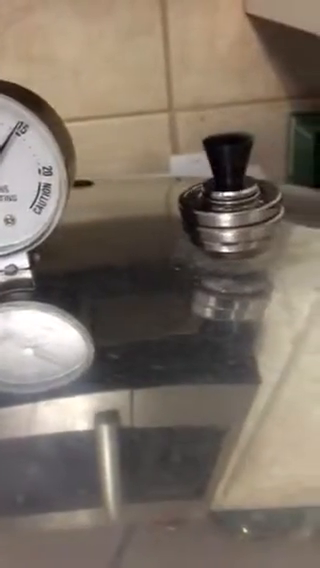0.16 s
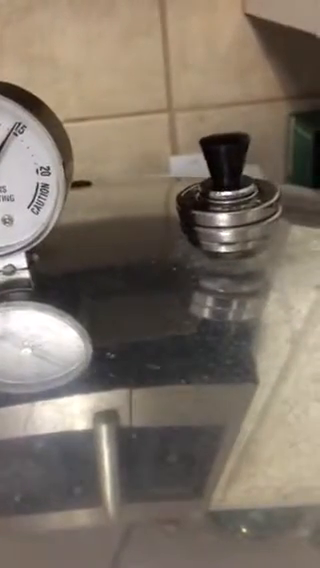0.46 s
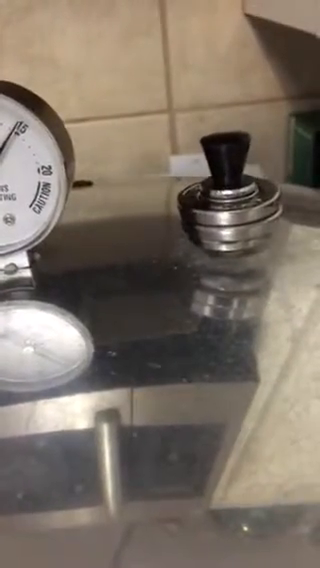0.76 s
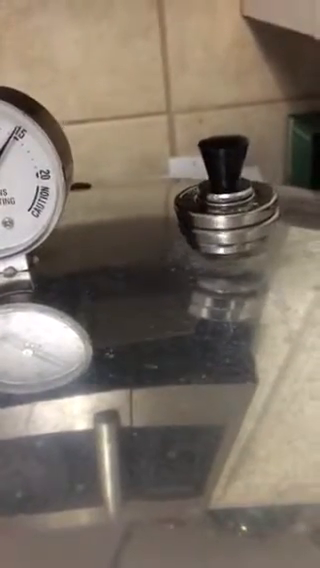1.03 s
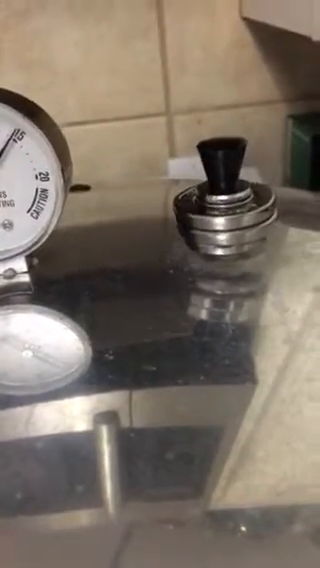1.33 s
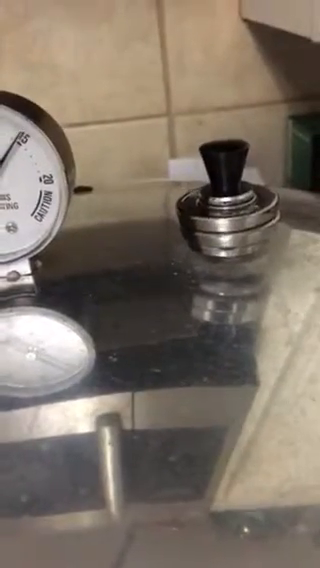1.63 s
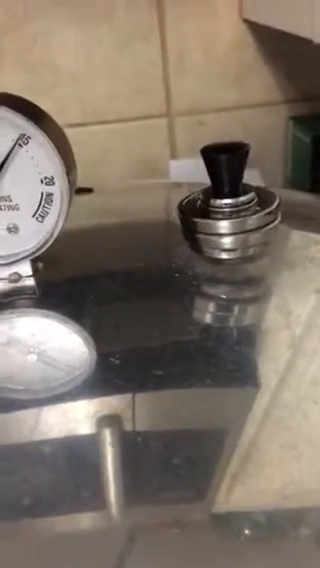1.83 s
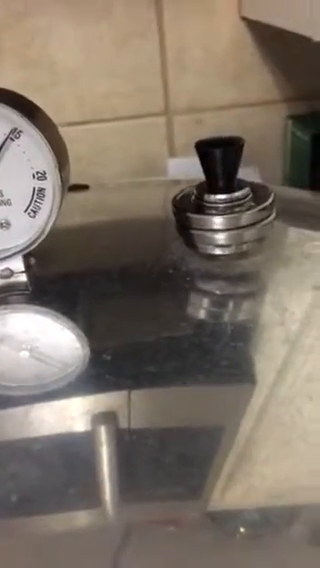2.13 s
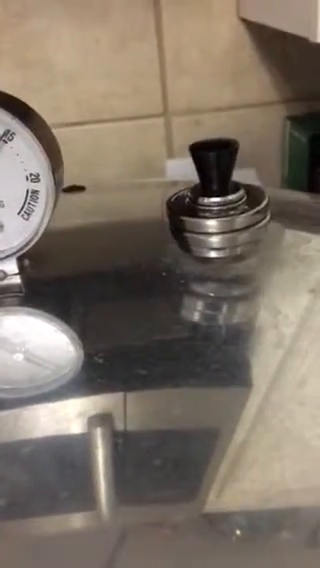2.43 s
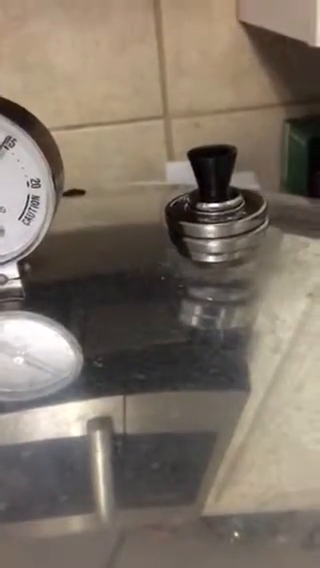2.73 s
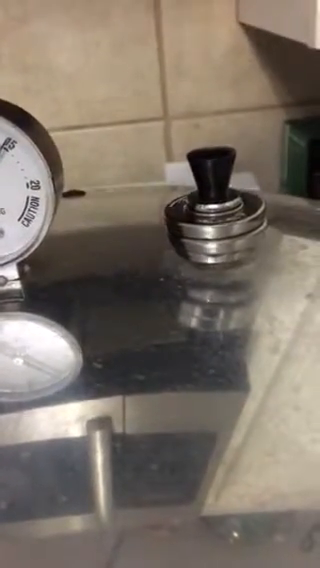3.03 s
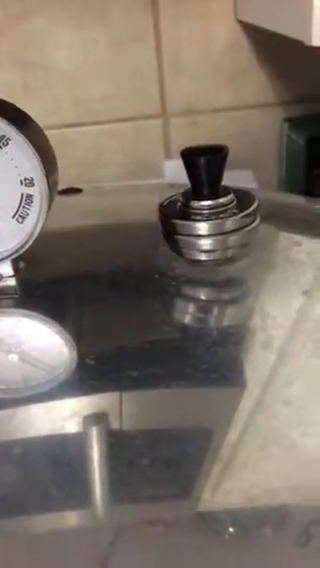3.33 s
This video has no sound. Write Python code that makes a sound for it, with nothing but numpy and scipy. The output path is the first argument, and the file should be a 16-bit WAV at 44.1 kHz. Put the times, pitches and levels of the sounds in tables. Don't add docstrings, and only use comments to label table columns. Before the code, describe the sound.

Steam hisses and sputters in rapid uneven puffs from a pressure cooker's rattling regulator weight, close up.

```python
import sys
import numpy as np
from scipy import signal
from scipy.io import wavfile

SR = 44100
rng = np.random.default_rng(int(sys.argv[2]) if len(sys.argv) > 2 else 0)


def invert_db(level):
    return 10 ** (np.asarray(level, dtype=float) / 20)


def to_wav(sig):
    pcm = np.clip(np.atleast_2d(sig), -1, 1) * 32767
    pcm = np.round(pcm).astype(np.int16)
    wavfile.write(sys.argv[1], SR, pcm.T)


N = 153468
TIME = np.arange(N) / SR

# peak time in seconds, level in dB, length in seconds, brightness in dB.
PUFFS_EARLY = [(0.06, -45, 0.39, -0.5), (0.118, -42, 0.038, 0), (0.168, -42, 0.014, -11),
               (0.219, -41, 0.022, -1), (0.272, -43.5, 0.028, -1), (0.315, -36, 0.022, -6),
               (0.369, -34.5, 0.023, -7), (0.416, -30, 0.025, -3.5), (0.466, -26.5, 0.026, 7),
               (0.518, -35.5, 0.026, 2), (0.562, -42.5, 0.036, -0.9), (0.621, -33.5, 0.029, -3.5),
               (0.668, -41, 0.031, 0.7), (0.724, -29.5, 0.025, -5.5), (0.768, -40.5, 0.047, 2.5),
               (0.816, -31.5, 0.023, 0), (0.878, -42.5, 0.038, 11), (0.91, -37, 0.02, 10),
               (1.018, -43, 0.19, 4.5), (1.118, -36, 0.036, -3), (1.154, -35, 0.023, 2),
               (1.205, -34, 0.017, -4), (1.239, -44.5, 0.064, 12), (1.296, -40, 0.028, 4),
               (1.342, -40, 0.033, -8), (1.441, -38.5, 0.12, 2.5), (1.489, -35, 0.019, 4),
               (1.543, -39, 0.02, -2), (1.59, -35.5, 0.026, 6.5), (1.641, -34, 0.025, 2)]
# peak time in seconds, level in dB, length in seconds, brightness in dB.
PUFFS_LATE = [(1.681, -45, 0.028, 8), (1.74, -28.5, 0.027, 1), (1.803, -38.5, 0.044, -1),
              (1.832, -36.5, 0.029, -4), (1.894, -28, 0.026, -3.5), (1.968, -38, 0.063, 0),
              (2.039, -44.5, 0.016, 1), (2.11, -39.5, 0.12, 1), (2.186, -35.5, 0.043, -6),
              (2.278, -35, 0.079, 4), (2.368, -34, 0.052, -2), (2.462, -38, 0.084, 3),
              (2.504, -35.5, 0.017, -10), (2.564, -34, 0.025, 2), (2.598, -35, 0.032, 4),
              (2.665, -36.5, 0.034, -2), (2.716, -37.5, 0.11, 3), (2.801, -31.5, 0.023, -1.0),
              (2.855, -36, 0.032, 10.5), (2.893, -30.5, 0.028, -1.5), (2.941, -47.5, 0.025, 13),
              (2.995, -36, 0.056, 0), (3.085, -35.5, 0.019, 0), (3.124, -37, 0.085, -1),
              (3.215, -32, 0.041, -1.5), (3.282, -33, 0.021, -3), (3.313, -31.3, 0.032, 0.5),
              (3.374, -31.5, 0.028, 0.5), (3.428, -29.5, 0.023, -3), (3.45, -43.5, 0.25, 5.5)]
LEAK_DB = -47
# time in seconds, change in dB.
LEANS = [(.434, -3), (.527, 3.5), (.604, 2), (1.18, -2), (1.542, 6.5), (1.716, 2), (1.868, -6.5),
         (2.072, 6), (2.241, 4.5), (2.321, -12), (2.501, -3), (2.909, -4), (3.355, -7), (3.419, -12)]
LEAN_S, ROAR_LEAD_S = 0.03, 0.0017
# time in seconds, change in dB.
SPUTTERS = [(.057, -2), (.317, 0), (.396, 3), (.435, -4), (.445, 0), (1.372, -6), (1.434, 4), (1.876, 2),
            (2.068, -2), (2.192, 3), (2.206, -3), (2.288, 4.5), (2.299, -7), (2.486, 3), (2.516, 4),
            (2.528, -5), (2.655, 2.5), (2.786, 3.5), (2.968, -1), (3.09, -3), (3.345, -7), (3.445, 3.5)]
SPUTTER_S = 0.0061


def steam():
    flow, bright = np.full(N, invert_db(LEAK_DB)), np.zeros(N)
    for s, db, length, bright_db in list(PUFFS_EARLY) + list(PUFFS_LATE):
        puff = invert_db(db) * bell(s, length)
        flow = flow + puff
        bright = bright + puff * bright_db
    early_flow = np.interp(TIME + ROAR_LEAD_S, TIME, flow)
    roar_db = 20 * np.log10(early_flow / flow)
    roar_db = roar_db + sum(db * bell(s, LEAN_S) for s, db in LEANS)
    sputter = invert_db(sum(db * bell(s, SPUTTER_S) for s, db in SPUTTERS))
    return flow * sputter * jet(bright / flow, roar_db) + spits()


# frequency in Hz, level in dB per Hz.
JET = [(700, -18), (1800, -11.5), (3300, -9.5), (5600, -1.5), (7500, -5.5), (10400, -8), (13000, -11),
       (16000, -7.5)]
# frequency in Hz, width in Hz, boost in dB.
CAVITIES = [(2387, 166, 3.5), (3920, 57, 8), (5320, 140, 3.5), (5660, 140, 3.5), (6090, 510, 4),
            (6950, 150, 4.5), (15400, 790, 1.5)]
# frequency in Hz, width in Hz, cut in dB.
DIPS = [(2850, 250, 4), (3720, 120, 5), (4310, 100, 3), (4850, 170, 8), (8520, 150, 2), (10450, 500, 4)]
DROPS_PER_S, DROP_SHARE, DROP_SPREAD_DB = 2800, 0.47, 4.0
ECHO_DB = -18


def jet(bright_db, roar_db):
    drops = np.array([grains(DROPS_PER_S, DROP_SPREAD_DB), grains(DROPS_PER_S, DROP_SPREAD_DB)])
    turbulence = rng.standard_normal((2, N))
    source = np.sqrt(1 - DROP_SHARE) * turbulence + np.sqrt(DROP_SHARE) * drops
    hiss = banded(source, JET, low_hz=605.3, count=15, patchy_db=1.5, rate=9.4,
                  extra_db=bright_db, roar_db=roar_db)
    for hz, width, db in CAVITIES:
        hiss = peak(hiss, hz, width, db)
    for hz, width, db in DIPS:
        hiss = peak(hiss, hz, width, -db)
    echoes = np.zeros(SR // 50)
    echoes[rng.integers(90, SR // 100, size=5)] = invert_db(ECHO_DB)
    echoes = signal.lfilter([.5], [1, -.5], echoes)
    echoes[0] = 1
    return rms_one(signal.fftconvolve(hiss, echoes)[:N])


# time in seconds, peak level in dB.
SPITS = [(0.4516, -25), (0.4654, -16), (0.533, -13), (0.7311, -12), (0.7344, -24), (1.1532, -7),
         (1.9117, -19), (2.1944, -25), (2.4531, -17), (2.8996, -27), (3.2782, -3), (3.2895, -19),
         (3.3012, -21), (3.4121, -26), (3.4194, -15), (3.4412, -26)]


def spits():
    bursts = np.zeros(N)
    for s, db in SPITS:
        bursts[int(s * SR)] = invert_db(db - 1.5)
    return bandpass(bursts, 2200, 9500, order=3)


# time in seconds, centre in Hz, level in dB.
RIM = [
    (.9, 12500, -51),
    (1.3, 13100, -43.5),
    (1.6, 11700, -44.5),
    (2.29, 12800, -41),
    (2.68, 12000, -40),
]
RIM_S, RIM_WIDTH_HZ = 0.075, 1300


def rim():
    out, noise = 0, rng.standard_normal(N)
    for s, hz, db in RIM:
        band = bandpass(noise, hz - RIM_WIDTH_HZ, hz + RIM_WIDTH_HZ)
        out = out + invert_db(db) * bell(s, RIM_S) * rms_one(band)
    return out


# time in seconds, peak level in dB, strongest frequency in Hz.
KNOCKS = [(0.0198, -44, 1100), (0.0443, -33.5, 1120), (0.1034, -36, 1050), (0.2464, -38.5, 1110),
          (0.3, -42, 1040), (0.3285, -35.5, 1040), (0.3591, -29, 1280), (0.4338, -35, 1010),
          (0.5112, -43, 1110), (0.5751, -44, 1020), (0.5985, -40, 1000), (0.6444, -34, 1120),
          (0.6967, -49, 1020), (0.7183, -47, 1280), (0.74, -39.5, 999), (0.8747, -41, 1100),
          (0.9289, -37.5, 1030), (1.0355, -36.5, 1040), (1.0574, -42.5, 1110), (1.1623, -38, 1010),
          (1.1997, -38, 1110), (1.2502, -37, 1100), (1.333, -34, 993), (1.399, -39.5, 1010),
          (1.4905, -37, 1060), (1.509, -37, 1110), (1.5457, -38, 1110), (1.6273, -45, 1120),
          (1.7117, -39, 1020), (1.7926, -40.5, 1010), (1.8215, -39, 1110), (1.87, -46, 1110),
          (1.8906, -35.5, 1020), (1.949, -38, 1080), (1.9761, -38.5, 1030), (2.0422, -37, 1010),
          (2.1237, -45, 996), (2.1596, -45, 1120), (2.2054, -42, 1110), (2.2417, -45, 1120),
          (2.3111, -42, 1010), (2.3614, -41.5, 1010), (2.493, -42, 1110), (2.5222, -48, 1120),
          (2.6254, -38, 1010), (2.6638, -40, 1120), (2.7302, -34.5, 1100), (2.7696, -40.5, 1010),
          (2.878, -38.5, 1030), (2.9816, -39, 1000), (3.09, -39, 1000), (3.13, -40, 1030),
          (3.1617, -35, 1070), (3.186, -38, 1020), (3.237, -37, 1100), (3.4007, -45, 1010)]
# frequency in Hz, level in dB, T60 in seconds.
LID = [
    (1011, 0, .08),
    (1050, -3, .05),
    (1119, -1, .09),
    (1270, -11, .05),
]
KNOCK_DB, KNOCK_RISE_S, AIM_HZ = -1, 0.0012, 55
RATTLE_PER_S, RATTLE_DB = 200, -80
WOBBLE_S, WOBBLE_PER_S = .00008, 12


def lid():
    s, db, aim = np.transpose(KNOCKS)
    out, t = 0, np.arange(SR // 20) / SR
    rattle = invert_db(RATTLE_DB + 2 * drift(23))
    for hz, level_db, t60 in LID:
        clicks = np.zeros(N)
        miss_db = 10 * np.minimum(abs(aim - hz) / AIM_HZ, 1.5)
        clicks[(s * SR).astype(int)] = invert_db(db + KNOCK_DB - miss_db)
        push = 2 * np.exp(-t / KNOCK_RISE_S) * np.cos(2 * np.pi * hz * t) / (KNOCK_RISE_S * SR)
        knocks = signal.fftconvolve(clicks, push)[:N]
        shaking = invert_db(level_db) * rattle * grains(RATTLE_PER_S, 2.0)
        out = out + ring(knocks + shaking, hz, t60)
    delay = WOBBLE_S * SR * drift(WOBBLE_PER_S)
    return np.interp(np.arange(N) + delay, np.arange(N), out)


# time in seconds, peak level in dB, frequency in Hz.
BUMPS = [(0.299, -37.5, 593), (0.355, -35.5, 307), (0.566, -44, 288), (0.596, -45.5, 393),
         (0.658, -41, 366), (0.716, -38, 290), (0.898, -43, 272), (1.038, -38, 380), (1.332, -40, 367),
         (1.371, -41.5, 270), (1.821, -40, 378), (1.889, -40.5, 580), (1.956, -40.5, 275),
         (2.042, -43, 567), (2.201, -41, 257), (2.24, -40.5, 209), (2.304, -40.5, 598), (2.356, -43, 224),
         (2.721, -41.5, 377), (3.061, -50, 242), (3.245, -43, 244)]
# time in seconds, peak level in
# dB, frequency in Hz.
MORE_BUMPS = [
    (2.779, -33, 280),
    (.362, -39, 905),
    (.025, -44, 318),
    (3.03, -37, 1005),
]
BUMP_T60_S, BUMP_DB, BUMP_PUFF_DB = .075, -2.5, -9


def pot():
    out, t = np.zeros(N + SR), np.arange(SR // 4) / SR
    rumble = rms_one(bandpass(rng.standard_normal(N + SR), 160, 550))
    for s, db, hz in list(BUMPS) + list(MORE_BUMPS):
        here = slice(int(s * SR), int(s * SR) + len(t))
        shape = invert_db(db - 60 * t / BUMP_T60_S) * (1 - np.exp(-t / 0.00067))
        tone = invert_db(BUMP_DB) * np.sin(2 * np.pi * hz * t)
        out[here] += shape * (tone + invert_db(BUMP_PUFF_DB) * rumble[here])
    return out[:N]


LULLS = [.085, 0.201, 0.549, .845, .965, 1.46, 1.61, 1.78, 1.93, 2.091, 2.47, 3.25, 3.47]
LULL_S, LULL_DB = .035, -7


def lulls():
    return invert_db(sum(LULL_DB * bell(s, LULL_S) for s in LULLS))


# frequency in Hz, level in dB per Hz.
MURMUR = [(25, -7), (50, 7.5), (110, 1), (280, 6), (520, 1), (640, 5.5), (800, -0.5), (2000, -3.5)]
MURMUR_DB = -49.5


def murmur():
    noise = rng.standard_normal((2, N))
    low = banded(noise, MURMUR, low_hz=21.86, count=24, patchy_db=0.0, rate=15.0)
    return invert_db(MURMUR_DB) * rms_one(low)


KITCHEN_T60_S, KITCHEN_DB = 0.29, -21.5


def kitchen(x):
    t = np.arange(SR // 2) / SR
    dull = signal.lfilter([.5], [1, -.5], rng.standard_normal(len(t)))
    tail = dull * invert_db(-60 * t / KITCHEN_T60_S) * (t > .004)
    tail = tail / np.sqrt(np.sum(tail ** 2))
    return invert_db(KITCHEN_DB) * signal.fftconvolve(x, tail)[:N]


BRIGHT_HZ, ROAR_HZ = 8250, 4600


def banded(source, spectrum, low_hz, count, patchy_db, rate, extra_db=0, roar_db=0):
    out, edges = 0, low_hz * 2 ** (np.arange(count + 1) / 3)
    for k, (low, high) in enumerate(zip(edges, edges[1:])):
        hz = np.sqrt(low * high)
        level_db = at_hz(spectrum, hz) + patchy_db * drift(rate)
        level_db = level_db + extra_db / (1 + (BRIGHT_HZ / hz) ** 8)
        level_db = level_db + roar_db / (1 + (hz / ROAR_HZ) ** 8)
        out = out + bandpass(source[k % 2], low, high) * invert_db(level_db)
    return out


def grains(rate, spread_db):
    sizes = invert_db(spread_db * np.minimum(rng.exponential(1, N), 4)) * rng.choice([-1, 1], N)
    return rms_one(sizes * (rng.random(N) < rate / SR))


def ring(clicks, hz, t60):
    r, w = invert_db(-60 / (t60 * SR)), 2 * np.pi * hz / SR
    return signal.lfilter([0, np.sin(w)], [1, -2 * r * np.cos(w), r * r], clicks + 1e-18)


def peak(x, hz, width, db):
    a, w, g = np.tan(np.pi * width / SR), -2 * np.cos(2 * np.pi * hz / SR), invert_db(db / 2)
    return signal.lfilter([1 + a * g, w, 1 - a * g], [1 + a / g, w, 1 - a / g], x)


def drift(rate):
    r = np.exp(-80 * np.pi * rate / SR)
    slow = signal.lfilter([1], [1, -2 * r, r * r], rng.standard_normal(N // 40 + 2002))[2000:]
    return np.interp(np.arange(N) / 40, np.arange(len(slow)), rms_one(slow))


def bandpass(x, low, high, order=2):
    return signal.sosfilt(signal.butter(order, [low, high], "band", fs=SR, output="sos"), x)


def bell(s, length):
    return 2 ** -((2 * (TIME - s) / length) ** 2)


def at_hz(points, hz):
    points = np.array(points)
    return np.interp(np.log(hz), np.log(points[:, 0]), points[:, 1])


def rms_one(x):
    return x / np.sqrt(np.mean(x ** 2) + 1e-20)


def scene():
    quiet = lulls()
    cooker = steam() + rim() + quiet * lid() + pot()
    return (cooker + kitchen(cooker) + quiet * murmur())[None]


def band_limit(x):
    return signal.sosfilt(signal.butter(12, 16780, fs=SR, output="sos"), x)


CUTOFF_HZ = 15850


def record(dry):
    low_pass = signal.ellip(12, .5, 80, CUTOFF_HZ - 130, fs=SR, output="sos")
    mix = signal.sosfilt(low_pass, dry)
    return band_limit(mix)


dry = scene()
out = record(dry)
to_wav(out)
```